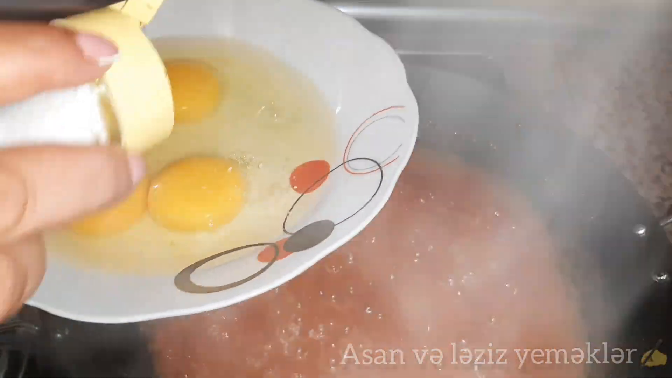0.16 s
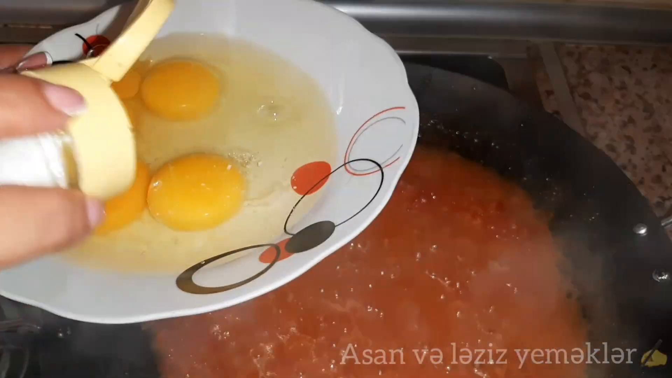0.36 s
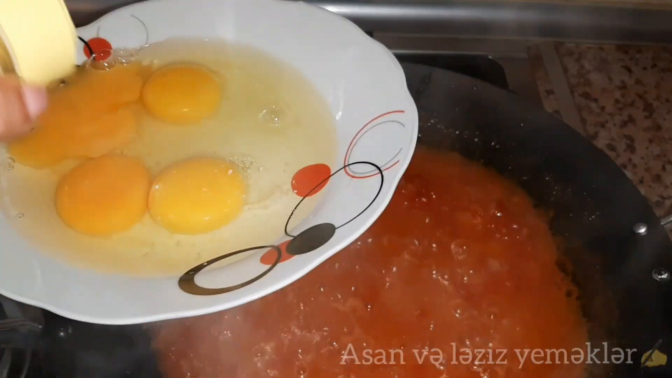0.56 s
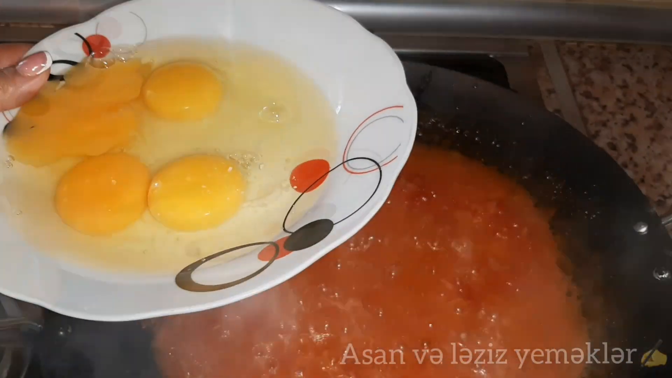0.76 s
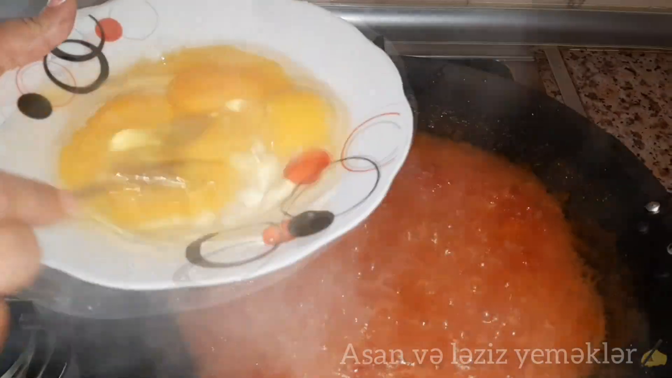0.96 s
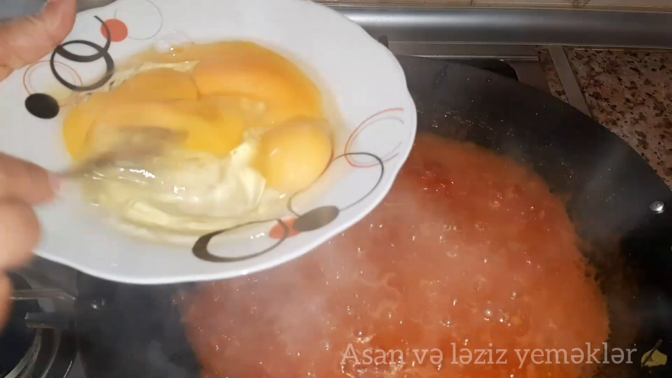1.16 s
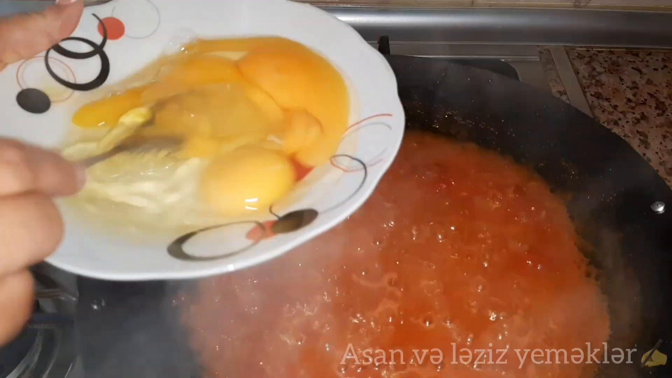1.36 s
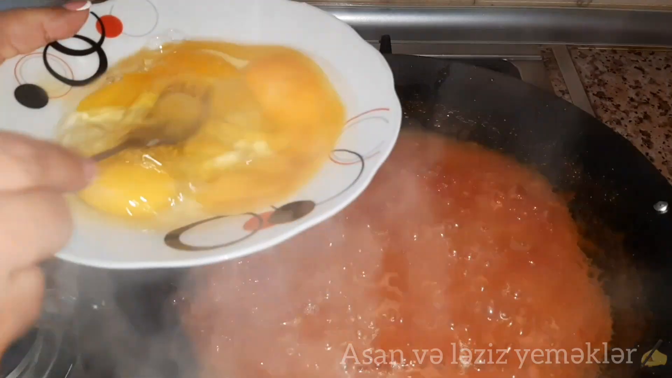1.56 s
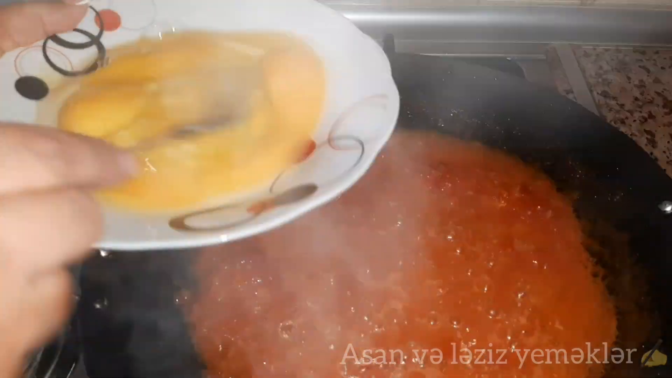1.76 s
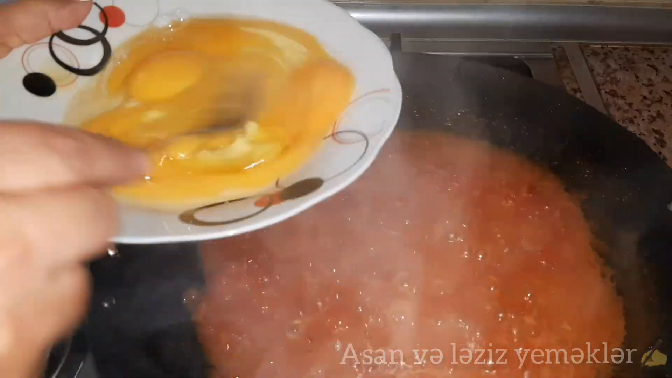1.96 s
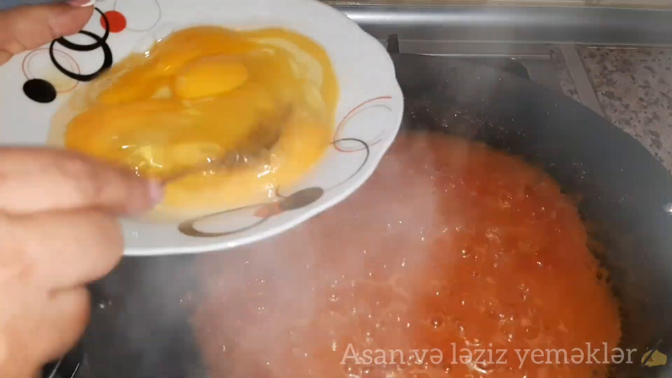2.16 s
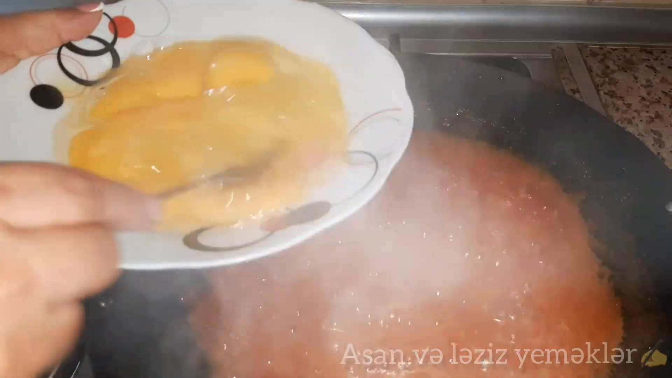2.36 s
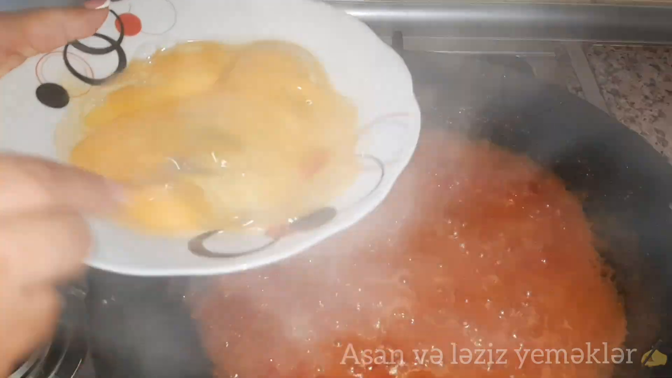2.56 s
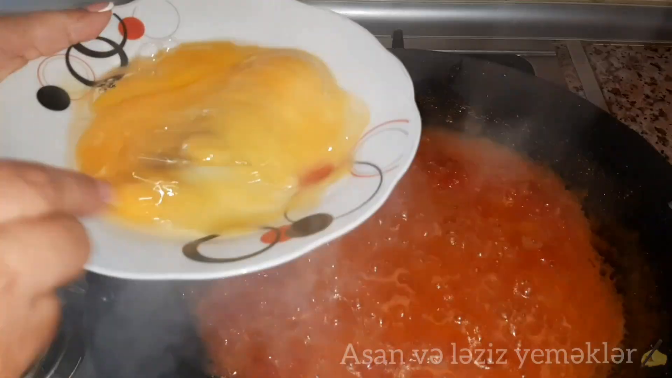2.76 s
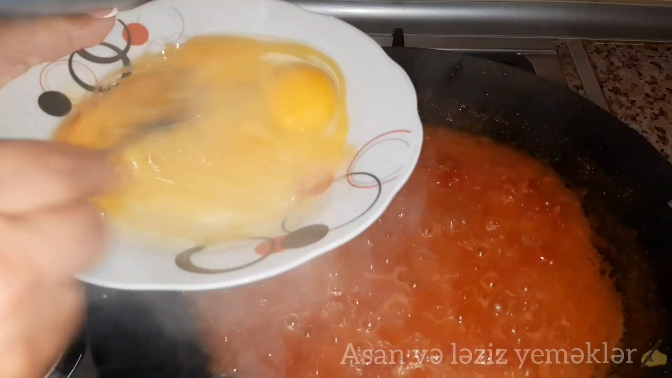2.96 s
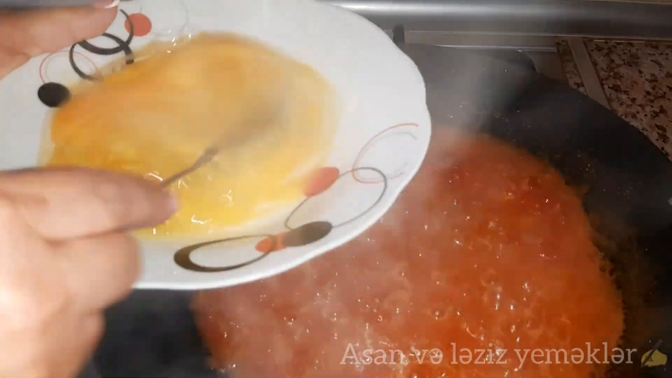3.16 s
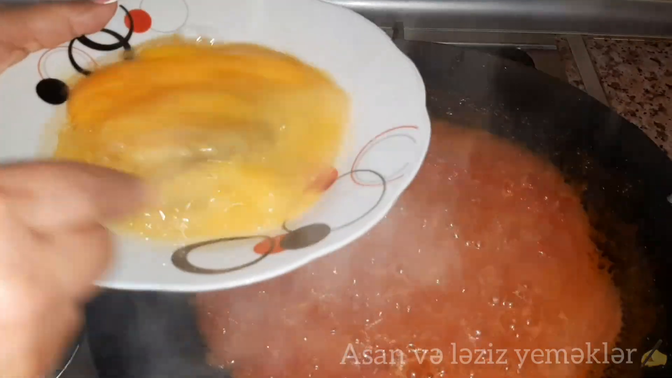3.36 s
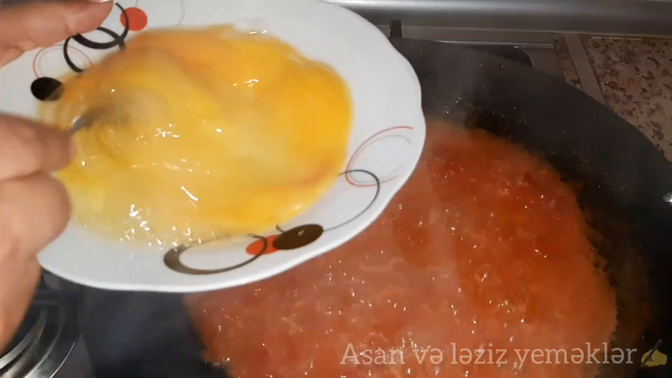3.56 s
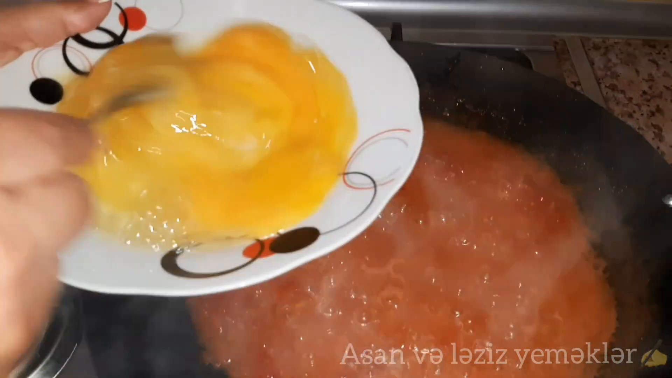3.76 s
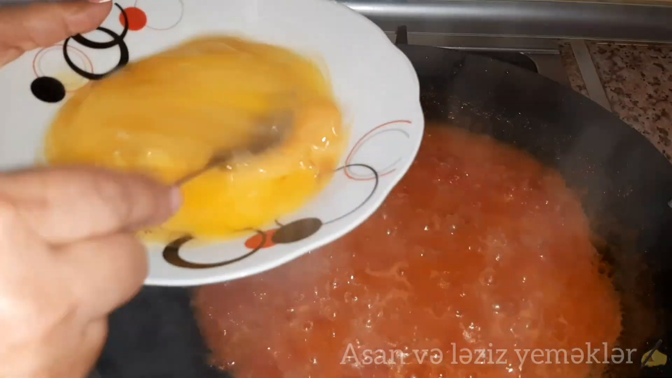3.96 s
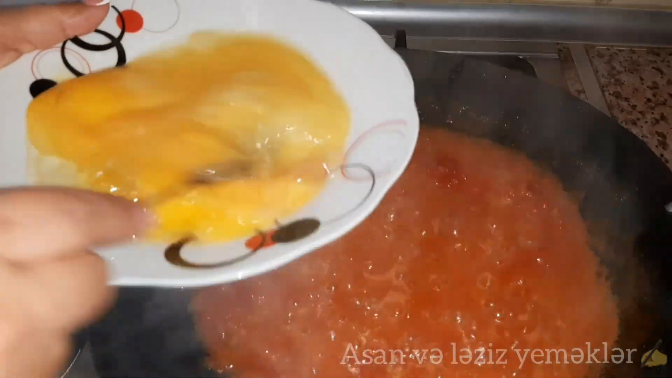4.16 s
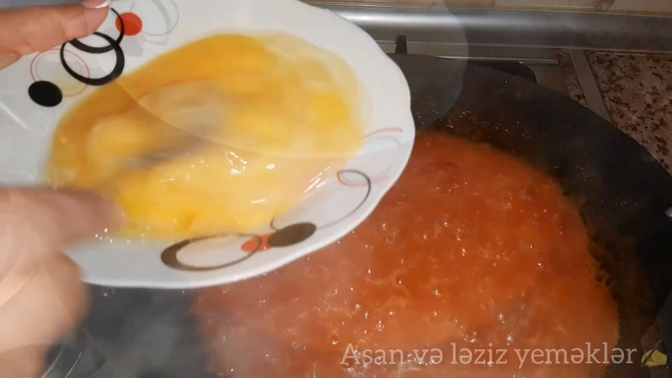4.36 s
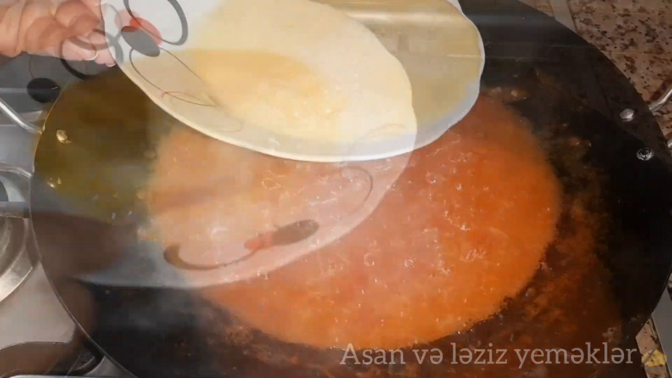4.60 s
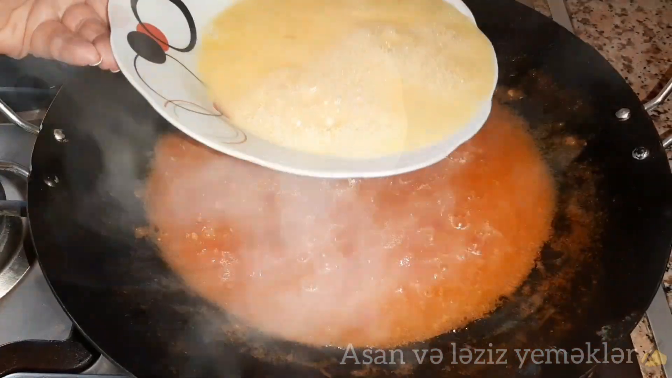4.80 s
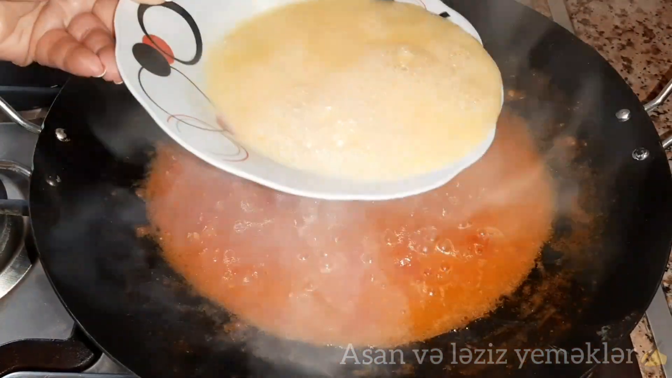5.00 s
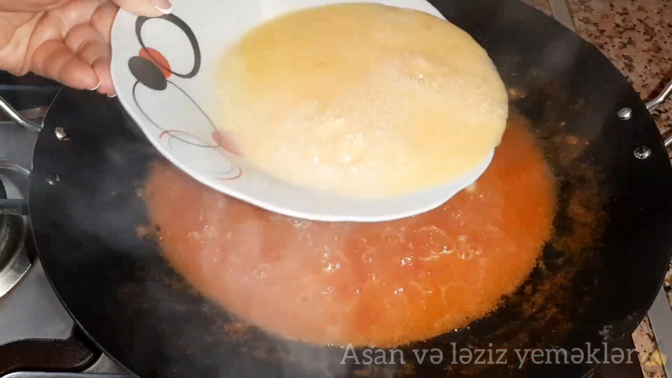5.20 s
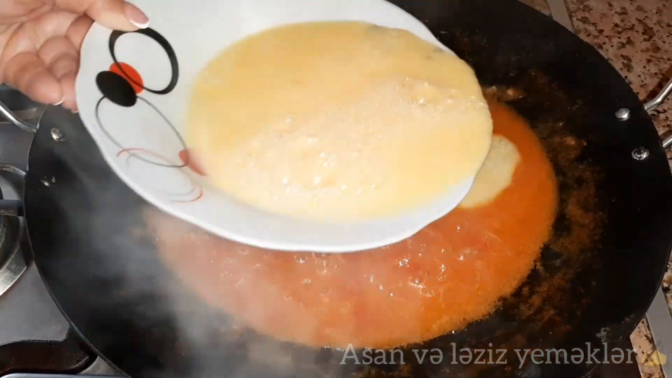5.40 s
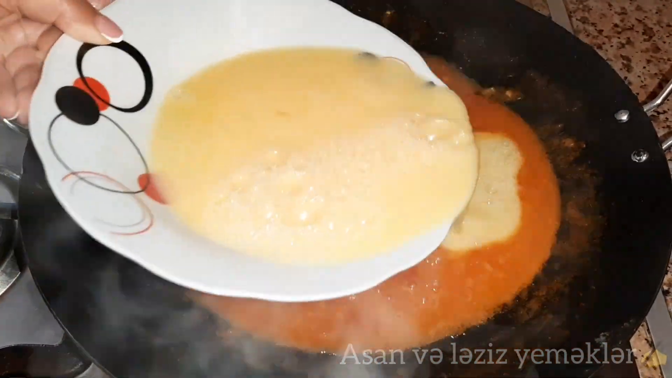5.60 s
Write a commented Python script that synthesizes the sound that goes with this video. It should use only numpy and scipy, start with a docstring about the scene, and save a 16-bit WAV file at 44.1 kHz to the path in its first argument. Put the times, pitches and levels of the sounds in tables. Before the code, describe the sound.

In a small kitchen, eggs are beaten on a china plate close to the microphone, a little to the left. The metal spoon drags once, then clinks in a quick, even rhythm with light liquid slaps, while a wok of tomato sauce bubbles softly over a burner. Near the end the strokes weaken and stop, and the sizzling swells, with a sharp double pop of bursting sauce.

```python
"""After a short silence, tomatoes simmer in a wok: tiny bubbles burst over steam and a rushing burner.
A metal spoon drags across a china plate held above it, then beats eggs six times a second. Each impact
excites the modes of spoon and plate, trapped air glugs in the egg, and a small kitchen reverberates.
The beating fades, the sizzle comes closer, and two bubbles of sauce burst sharply."""
import sys
import numpy as np
from scipy import signal
from scipy.fft import rfft, irfft, next_fast_len
from scipy.io import wavfile
from scipy.ndimage import uniform_filter1d

SR = 44100
rng = np.random.default_rng(int(sys.argv[2]) if len(sys.argv) > 2 else 0)


def to_wav(s):
    """Save 16-bit WAV."""
    ch = np.atleast_2d(s).T  # columns
    pcm = np.round(np.clip(ch, -1, 1) * 32767)  # PCM
    wavfile.write(sys.argv[1], SR, pcm.astype(np.int16))


N = 248724
T = np.arange(N) / SR
RING_T = T[:2600]  # time axis of one short event

# Impacts of spoon on plate: start_s, force_db, edge_db, spoon_hz, plate_hz, skid_s
# edge_db is high when the spoon's rim lands and low when its back does.
STROKES = [(0.8095, -3.8, 4.5, 6600, 2166, 0.0073), (0.994, -1.5, 2, 6040, 2168, 0.0065),
           (1.1846, -0.5, 3, 5890, 2210, 0.0051), (1.358, 0.5, -1, 5690, 2135, 0.0018),
           (1.5364, -0.5, -6, 5850, 2190, 0.0023), (1.696, 3, -4.5, 5930, 2080, 0.0009),
           (1.882, -3.5, -9, 5680, 2113, 0.0027), (2.0653, 3, -5.5, 6390, 2200, 0.0021),
           (2.2275, 3, -4.5, 6040, 2195, 0.0044), (2.408, 1.05, -3.5, 5760, 2266, 0.0048),
           (2.579, 2.3, -4, 5620, 2135, 0.0061), (2.7505, 4, 2.5, 6040, 2213, 0.0059),
           (2.8967, 2, 0, 6070, 2120, 0.0092), (3.0605, 2.25, 3, 6100, 2137, 0.009),
           (3.2311, 0.5, 1.5, 6200, 2255, 0.0039), (3.393, 0.5, 4.5, 6040, 2075, 0.0034),
           (3.5557, -0.5, -0.5, 5730, 2162, 0.0024), (3.6949, -3.5, 0, 5610, 2194, 0.00089),
           (3.852, -10.5, -9, 7300, 2330, 0.00052), (3.87, -2, 2.5, 6000, 2260, .002),
           (4.0103, -3, 0, 6300, 2280, 0.0015), (4.1814, -1, 0.5, 5960, 2140, 0.0038),
           (4.3414, -1, 1.5, 5430, 2233, 0.0015), (4.4813, -3, 2.5, 5750, 2347, 0.0031),
           (4.642, -9, 0, 5900, 2134, 0.0047), (4.8077, -13.5, 1.5, 7640, 2300, .004),
           (4.938, -18.5, 5, 6140, 2160, 0.0025)]


def amp(db):
    """Decibels to an amplitude ratio."""
    return 10 ** (np.asarray(db) / 20)


def unit_rms(x):
    """Normalisation to unit mean power."""
    return x / np.sqrt(np.mean(x ** 2) + 1e-20)


def curve_at(points, hz):
    """Interpolation along a logarithmic frequency axis."""
    knots_hz, values = np.transpose(points)
    return np.interp(np.log(hz + 1), np.log(knots_hz + 1), values)


def add(mix, start_s, sound):
    """Superposition: a sound joins the mix at its start time."""
    part = mix[:, round(start_s * SR):][:, :sound.shape[-1]]
    part += sound[..., :part.shape[1]]


def colour(x, gain):
    """Zero-phase filtering by a gain that is a function of frequency."""
    size = next_fast_len(x.shape[-1] + 2048)
    return irfft(rfft(x, size) * gain(np.fft.rfftfreq(size, 1 / SR)), size)[..., :x.shape[-1]]


def shaped(x, spectrum):
    """Spectral shaping by a curve in decibels, brought to unit power."""
    return unit_rms(colour(x, lambda hz: amp(curve_at(spectrum, hz))))


def bandpass(x, low_hz, high_hz):
    """Band-pass filtering with second-order slopes."""
    return signal.sosfilt(signal.butter(2, [low_hz, high_hz], "band", fs=SR, output="sos"), x)


def decay(t60_s):
    """Exponential damping: 60 dB of loss in t60_s."""
    return amp(-60 * RING_T / t60_s)


def ring(modes, spread_db=0., detune=0., count=5):
    """Modal synthesis: clusters of damped sines, weighted and tuned anew by each place of contact."""
    hz, db, t60_s = np.repeat(modes, count, axis=0).T[:, :, None]
    weight, shift, left, right = rng.standard_normal((4, len(hz), 1))
    cycles = hz * (1 + detune * shift) * RING_T + np.array([left, right]) * np.minimum(hz / 14000, .5)
    return (amp(db + spread_db * weight) * decay(t60_s) * np.sin(2 * np.pi * cycles)).sum(1)


def crack(t60_s, low_hz, high_hz):
    """Modal overlap: dense, quickly damped modes merge into a burst of noise."""
    return bandpass(rng.standard_normal((2, len(RING_T))) * decay(t60_s), low_hz, high_hz)


def struck(response, db, contact=np.ones((1, 1))):
    """Convolution of an impulse response with a contact force; db is its energy spread over 20 ms."""
    x = signal.fftconvolve(response, contact, axes=1)[:, :len(RING_T)]
    return amp(db) * x / np.sqrt((x ** 2).sum(1, keepdims=True) / (SR / 50))


def panned(x, balance):
    """Interaural level difference: each band leans left or right by its own amount."""
    return colour(x, lambda hz: amp(np.array([[.5], [-.5]]) * curve_at(balance, hz)))


def diffuse_noise():
    """Spatial coherence: noise at two nearby points is alike in the bass and unrelated in the treble."""
    # Likeness of left and right: frequency_hz, coherence
    likeness = [(60, 0.96), (300, 0.81), (640, 0.93), (1400, 0.56), (3100, 0.095), (7000, 0.019)]
    coherence = lambda hz: np.clip(curve_at(likeness, hz), 0, 1)
    left, unrelated = rng.standard_normal((2, N))
    right = colour(left, coherence) + colour(unrelated, lambda hz: np.sqrt(1 - coherence(hz) ** 2))
    return np.array([left, right])


def kitchen(x, first_echo_s=0.0048):
    """Reverberation: scattered reflections from hob and walls, each band dying at its own rate."""
    # Reverberation time of the room: frequency_hz, t60_s
    reverb_times = [(200, 0.26), (1200, 0.26), (2200, 0.38), (3500, 0.36), (6000, 0.25), (9200, 0.18),
                    (15000, 0.29)]
    size = SR // 2
    taps = rng.standard_normal((2, size)) * (rng.random((2, size)) < .12) * (T[:size] > first_echo_s)
    hz, t, bands = signal.stft(taps, SR, nperseg=256)
    absorption = amp(-60 * t / curve_at(reverb_times, hz)[:, None])
    tail = signal.istft(bands * absorption, SR, nperseg=256)[1]
    return signal.fftconvolve(x, tail / np.linalg.norm(tail[0]), axes=1)[:, :N]


def wok(bubbles_per_s=3000, size_db=4.0, pitches=16, burner_db=-12):
    """Shot noise: countless tiny bubbles burst over a hiss of steam and the low rush of the burner."""
    # Loudness of the wok as it comes closer: time_s, level_db
    levels = [(.62, -59), (1.5, -59.5), (2.3, -59.5), (3.4, -61.5), (4.25, -60.5), (4.95, -50), (5.4, -49),
              (5.63, -50)]
    # Spectral shapes of the sizzle and the burner: frequency_hz, gain_db
    sizzle_spectrum = [(150, -39), (250, -17.5), (367, -7.5), (538, 1.5), (640, -7.5), (686, -5),
                       (1020, -2), (1850, -5), (2160, -3.5), (4650, -1.5), (6590, -2), (7700, -5),
                       (12500, -9.5), (16000, -16)]
    burner_spectrum = [(20, -45), (45, -25), (80, 4), (110, -6), (150, -2), (200, -14), (300, -10.5),
                       (500, -9.5), (800, -21.5), (1500, -23)]
    bubbles, t = np.zeros((2, N)), T[:400]
    for hz in np.geomspace(600, 14000, pitches):
        cycles = hz * t
        chirp = np.sin(2 * np.pi * cycles * (1 + 0.016 * np.minimum(cycles, 10))) * np.exp(-cycles / 3)
        onsets = rng.integers(0, N, round(bubbles_per_s * T[-1] / pitches))
        sizes = np.minimum(rng.exponential(1, len(onsets)), 4)
        impulses = np.zeros((2, N))
        impulses[:, onsets] = amp(size_db * sizes) * rng.normal(0.27, 1, (2, len(onsets)))
        bubbles += signal.oaconvolve(impulses, hz * chirp[None], axes=1)[:, :N]
    flutter = unit_rms(uniform_filter1d(rng.standard_normal(N), size=1500))
    steam = diffuse_noise() * amp(3.2 * flutter)
    sizzle = shaped(unit_rms(bubbles) + amp(8.5) * steam, sizzle_spectrum)
    burner = shaped(diffuse_noise(), burner_spectrum)
    return (sizzle + amp(burner_db) * burner) * amp(np.interp(T, *np.transpose(levels)))


def sauce_pops():
    """Cavity resonance: a soft skin of sauce snaps, the hollow under it rings, and a spray fizzes."""
    # Bursting bubbles: start_s, level_db, pitch_hz, t60_s, relative_snap_db, spray_db
    bursts = [(5.2446, -14, 4600, 0.012, -16, -43), (5.2576, -13, 4400, 0.0059, -5, -60)]
    out = np.zeros((2, N))
    softness = signal.butter(3, 5500, fs=SR, output="sos")
    snap_age = RING_T / .0001
    snap = (1 - snap_age) * np.exp(-snap_age)
    for start_s, db, hz, t60_s, snap_db, spray_db in bursts:
        cavity = np.sin(2 * np.pi * hz * RING_T) * decay(t60_s) * (1 - np.exp(-RING_T / 0.000067))
        pop = signal.sosfilt(softness, cavity + amp(snap_db) * snap)
        spray = struck(crack(t60_s=0.044, low_hz=8100, high_hz=12400), spray_db)
        add(out, start_s, (amp(db) * pop + spray) * amp([[-2], [2]]))
    return out


def plate_thuds(hz=100, t60_s=0.022):
    """Rigid-body motion: a hard stroke shoves the plate, giving one heavily damped swing of air."""
    # Shoves of the whole plate: start_s, level_db
    shoves = [(2.7507, -50), (2.899, -51.5), (3.061, -37.5), (3.232, -56.5), (3.3932, -49), (3.557, -60.5),
              (3.8717, -54.5), (4.344, -44.5)]
    out = np.zeros((2, N))
    envelope = decay(t60_s) * (1 - np.exp(-RING_T / 0.0001))
    swing = -np.cos(2 * np.pi * hz * RING_T + np.array([[0], [.8]])) * envelope
    for start_s, db in shoves:
        add(out, start_s, struck(swing, db) * amp([[0], [-17]]))  # nearer the left
    return out


def spoon_drag(start_s=0.614, attack_s=0.015, hold_s=0.056, release_s=.07, sag_db_per_s=104):
    """Stick-slip friction: metal slides on glaze in tiny slips that start fast, sag and let go."""
    # Spectral shape of the scrape: frequency_hz, gain_db
    scrape_spectrum = [(1000, -19), (2900, -1.5), (3800, 8.5), (4600, -37), (5800, 9), (6600, 13),
                       (8000, -7), (11500, 3), (15500, -9)]
    slips = rng.standard_normal((2, N)) * (rng.random(N) < .15)
    age_s = np.maximum(T - start_s, 0)
    fall_db = sag_db_per_s * age_s + 60 * np.maximum(age_s - hold_s, 0) / release_s
    return shaped(slips, scrape_spectrum) * np.minimum(age_s / attack_s, 1) * amp(-42.5 - fall_db)


def spoon_touches(pitch_hz=6680):
    """Light impacts: the spoon grazes the plate on its way round and excites only high modes."""
    # Grazing contacts: start_s, level_db
    grazes = [(0.776, -43), (1.178, -38), (1.325, -30.5), (1.862, -39), (2.181, -44.5), (2.394, -46),
              (2.737, -35), (3.525, -38), (4.13, -36), (4.32, -34.5), (4.605, -39)]
    out = np.zeros((2, N))
    for start_s, db in grazes:
        tick = unit_rms(ring([(pitch_hz, 0, .03)], detune=.05))
        tick += amp(9.0) * unit_rms(crack(t60_s=0.029, low_hz=3250, high_hz=11400))
        add(out, start_s, amp(db) * tick / abs(tick).max())
    return out


def egg_glugs(length_s=0.024, wobble_octaves=0.054):
    """Bubble resonance: air trapped behind the spoon rings, gliding in pitch as the egg closes over."""
    # Air pockets in the egg: start_s, level_db, pitch_hz, rise_octaves
    pockets = [(0.808, -39, 1117, 0.038), (0.823, -48, 1396, 0.99), (1.357, -36, 990, 0.27),
               (1.537, -32, 1094, .07), (1.691, -44.5, 1305, 0.4), (1.88, -41.5, 1161, 0.18),
               (3.393, -45, 896, 0.16), (3.554, -42, 936, .08), (3.695, -35.5, 1044, .2),
               (3.696, -41.5, 1435, 0.245), (3.855, -43, 993, -0.16), (3.979, -48.5, 877, 0.164),
               (4.074, -51, 805, 0.52), (4.387, -53, 715, 0.2)]
    out, age = np.zeros((2, N)), RING_T / length_s
    envelope = np.tanh(age / 0.028) * np.exp(-1.4 * age ** 2)
    for start_s, db, hz, rise_octaves in pockets:
        wobble = unit_rms(uniform_filter1d(rng.standard_normal(len(age)), size=150))
        cycles = np.cumsum(hz * 2 ** (rise_octaves * np.tanh(age) + wobble_octaves * wobble)) / SR
        add(out, start_s, amp(db) * envelope * np.sin(2 * np.pi * cycles + np.array([[0], [1.1]])))
    return out


def contact_force(skid_s, grit=2.9, rebound=0.11, settle_s=0.0098):
    """Impact excitation: one blow, a skid over the glaze, and tiny rebounds as the spoon settles."""
    t = RING_T[:1000]
    envelope = np.exp(-(t / skid_s) ** 4) + rebound * np.exp(-(t / settle_s) ** 2)
    skid = rng.standard_normal((2, len(t))) * envelope
    return grit * skid / np.linalg.norm(skid[0]) + (t == 0)


def beating(ping_octaves_per_db=0.0026, slap_octaves_per_s=-.11):
    """Modal excitation: strokes ring spoon and plate and slap the egg; force and angle set the mix."""
    # Modes of spoon and plate together, from low register to high: pitch_hz, level_db, t60_s
    body_modes = [(3070, -24, 0.12), (3625, -10, 0.062), (3745, 0.5, 0.04), (4250, -0.5, 0.026),
                  (4600, 4, 0.011), (5160, -4, 0.071)]
    clank_modes = [(5620, -6, 0.018), (5930, -0.5, 0.018), (6152, 0.5, 0.028), (6120, -1, 0.015)]
    ping_modes = [(6650, 9, 0.0094), (7173, 2, 0.034), (7370, -18, 0.037), (7240, -1.5, 0.015)]
    top_modes = [(10040, -47, 0.032), (9430, 4, 0.024), (9730, -3, 0.06), (10430, 1.5, 0.046),
                 (11160, 7.5, 0.024), (11600, -1, 0.1), (12900, -1.5, 0.022), (14900, -22, 0.034),
                 (14700, -26, 0.017)]
    out = np.zeros((2, N))
    swell = 1 - np.exp(-RING_T / 0.02)  # the heavy low modes build up more slowly
    for start_s, force_db, edge_db, spoon_hz, plate_hz, skid_s in STROKES:
        contact = contact_force(skid_s)
        clank = ring(clank_modes, spread_db=4.0, detune=0.015)
        clank += amp(4.5) * ring([(spoon_hz, 0, .035)], detune=0.0046)
        rim_tuning = 2 ** (ping_octaves_per_db * edge_db)  # the ping is a little higher on the rim
        ping = ring(np.multiply(ping_modes, [rim_tuning, 1, 1]), detune=0.0098)
        body = ring(body_modes, spread_db=2.0, detune=0.021)
        top = ring(top_modes, spread_db=4.5, detune=0.0145)
        click = crack(t60_s=0.035, low_hz=2780, high_hz=11700)
        plate = ring([(plate_hz, 0, .038), (2130, -4, .024), (2290, -4, .024)], detune=0.017)
        slap_hz = 1300 * 2 ** (slap_octaves_per_s * start_s)  # deeper as the egg fills with air
        slap = crack(t60_s=0.043, low_hz=0.83 * slap_hz, high_hz=1.29 * slap_hz)
        # each register has a base level in dB and its own sensitivity to force and edge
        hit = struck(clank, -33.5 + 1.35 * force_db, contact)
        hit += struck(ping, -36.5 + force_db + 0.75 * edge_db, contact)
        hit += struck(body, -44.5 + 1.02 * force_db - 0.69 * edge_db, contact)
        hit += struck(top, -44.5 + 1.06 * force_db - 0.37 * edge_db, contact)
        hit += struck(click, -46 + 1.24 * force_db, contact)
        hit += struck(swell * plate, -42.5 + 0.69 * force_db - 0.33 * edge_db)
        hit += struck(swell * slap, -52 + 0.5 * force_db + 0.51 * edge_db)
        add(out, start_s, hit)
    # the strokes carry little below 700 Hz, and the egg cushions the very top
    return bandpass(out, low_hz=700, high_hz=14800)


def scene():
    """Superposition of direct sound, the kitchen's reflections and the simmering wok."""
    # The plate lies to the left: frequency_hz, left_minus_right_db
    plate_side = [(1000, 4.5), (2200, -2), (4000, 2.5), (6000, 8.5), (12000, 1)]
    spoon = beating() + spoon_touches() + spoon_drag() + egg_glugs()
    # the loosely held plate moves about, so strokes alternate between two sets of reflections
    turn = np.searchsorted(np.transpose(STROKES)[0], T) % 2
    alternate_strokes = [spoon * (turn == k) for k in range(2)]
    echoes = sum(kitchen(part) + kitchen(part[::-1]) for part in alternate_strokes)
    pops = sauce_pops()
    direct = amp(-1.0) * panned(spoon, plate_side) + plate_thuds() + pops
    return direct + amp(-9.5) * echoes + amp(-16) * kitchen(pops) + wok()


def record(dry, start_s=0.616, cutoff_hz=15950):
    """Linear filtering and gating: each side has its own colour, an abrupt start and a band limit."""
    # Balance of the two channels: frequency_hz, left_minus_right_db
    balance = [(60, 0.5), (200, 2.5), (400, 0.5), (1200, -1.1), (2300, -2), (4400, -0.8), (5900, -0.5),
               (7200, 5), (9000, 10), (12000, 2.5), (15000, -3.5)]
    heard = panned(dry, balance) * (T > start_s)
    lowpass = signal.firwin(511, cutoff_hz, window=("kaiser", 9), fs=SR)
    return signal.oaconvolve(heard, lowpass[None], "same")


dry = scene()
out = record(dry)
to_wav(out)
```